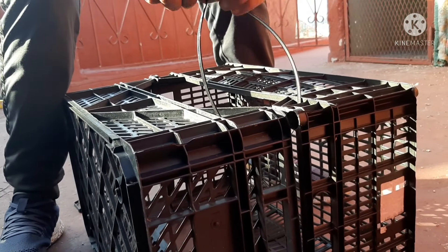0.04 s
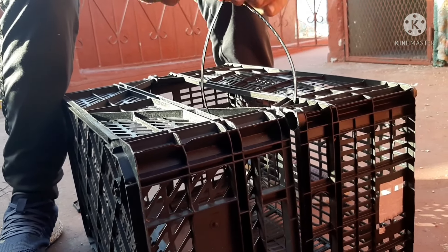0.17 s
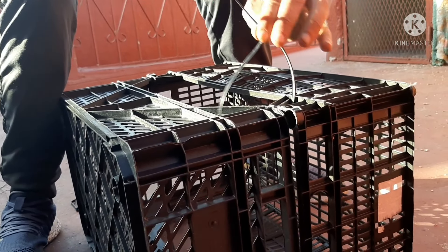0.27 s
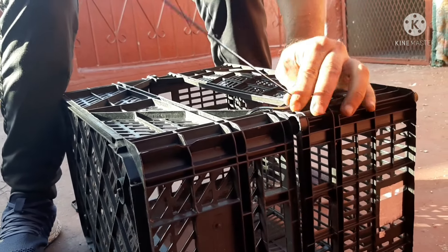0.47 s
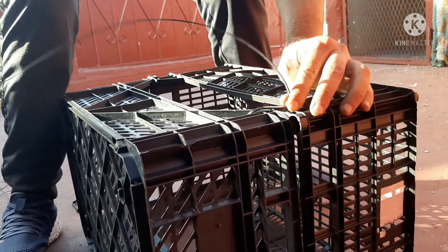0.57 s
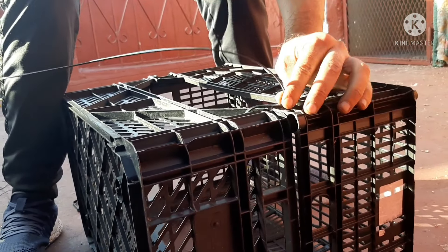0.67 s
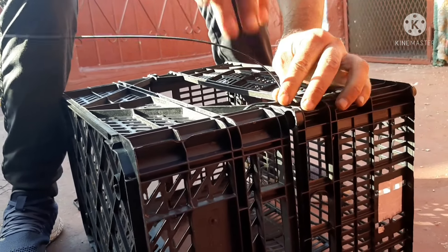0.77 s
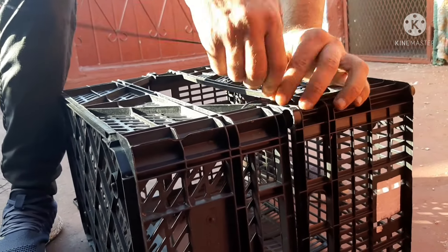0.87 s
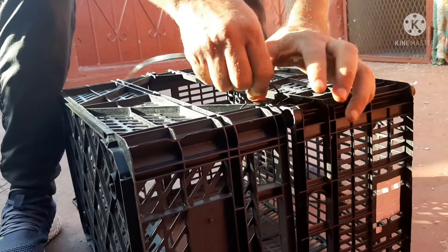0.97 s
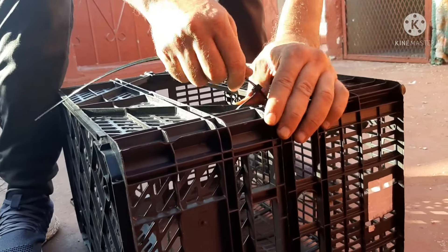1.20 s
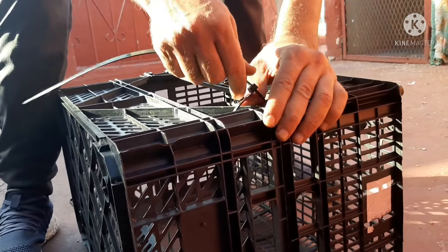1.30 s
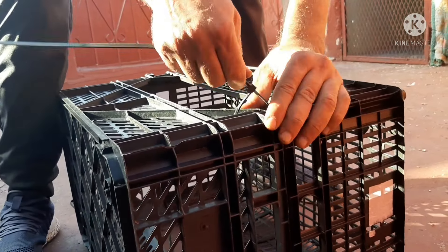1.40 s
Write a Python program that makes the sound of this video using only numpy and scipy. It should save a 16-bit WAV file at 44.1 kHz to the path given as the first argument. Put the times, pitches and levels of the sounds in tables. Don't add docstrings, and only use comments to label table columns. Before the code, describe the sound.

Close stereo sound of a plastic tie ratcheting on a plastic crate, one fast rising and falling zip, small rubs and taps of fingers, a short second tightening, and a faint bird over soft outdoor air.

```python
import sys
import numpy as np
from scipy import signal
from scipy.fft import rfft, irfft
from scipy.io import wavfile
from scipy.ndimage import uniform_filter1d

SR = 44100
rng = np.random.default_rng(int(sys.argv[2]) if len(sys.argv) > 2 else 0)


def persist_wave(psi):
    counts = np.round(np.clip(psi, -1, 1) * 32767).astype(np.int16)
    wavfile.write(sys.argv[1], SR, np.atleast_2d(counts).T)


def undo_db(level):
    steps = np.asarray(level, float) / 20
    return 10 ** steps


N = 63945

# pitch_hz, level_db_per_hz
AIR_SPECTRUM = [(59, -68), (100, 9.5), (2120, -12), (2630, -18), (4580, -20), (7480, -28), (8510, -42),
                (14800, -25.5), (16500, -62)]
# time_s, level_db
AIR_LEVEL = [(0, 6.5), (.24, 6), (.27, 1), (1.25, 1), (1.45, -3)]
# pitch_hz, likeness_0_to_1
AIR_LIKENESS = [(60, .72), (300, .8), (600, .5), (1500, .25), (15000, .2)]
# time_s, level_db
DRONE_LEVEL = [(0.0, -45), (0.036, -58.5), (0.088, -43.5), (0.116, -55.5), (0.234, -40), (0.286, -74),
               (0.37, -50), (0.634, -53), (0.654, -68), (0.69, -56), (1.356, -52), (1.45, -97.5)]
# pitch_hz, level_db_per_hz
DRONE_SPECTRUM = [(40, -9.5), (58, 4), (85, -4), (110, -29)]
# time_s, pitch_hz, level_db
BIRD = [
    (1.258, 3150, -80),
    (1.272, 3170, -62),
    (1.295, 2950, -63),
    (1.33, 2980, -63),
    (1.35, 2880, -67),
    (1.39, 2850, -80),
]
# start_s, length_s, level_db, centre_hz, width_octaves
SCUFFS = [(0.206, 0.11, -39, 2750, 4.1), (0.41, 0.24, -42, 3230, 2.84), (0.514, 0.042, -33.5, 3240, 5.6),
          (0.583, 0.0394, -45, 1200, 0.062), (0.547, 0.1, -46, 710, 3.7), (0.62, 0.08, -60, 12200, 5.1),
          (0.68, 0.13, -65, 2098, 0.044), (0.702, 0.18, -73.5, 13100, 0.46), (0.928, 0.091, -64, 6500, 2.1),
          (0.999, 0.066, -50, 4240, 1.1), (1.009, .03, -58, 13400, 0.45), (1.024, 0.1, -57, 4630, 1.7),
          (1.096, 0.1, -46, 850, 5.1)]
# time_s, peak_db, pitch_hz, brightness_db, knock_db
TAPS = [(0.0667, -47.5, 3860, -30, -12), (0.2184, -37, 5000, 2, -33), (0.2299, -23.5, 5600, -1, -30),
        (0.5291, -26, 5000, 4.5, -18), (0.5327, -30.5, 2300, 10.5, -13), (0.6616, -50, 5000, 8.5, -32),
        (0.7107, -39.5, 3692, -3.5, -34), (0.729, -52, 5000, -1, -27), (0.7319, -50, 5000, 5, -26),
        (0.773, -55, 5000, 0, -19), (0.8056, -49.5, 2045, 9, -4.5), (0.8419, -37, 5510, 4.5, -12.5),
        (.8465, -45, 5000, 5.5, -31), (.9711, -49, 5000, 3.5, -33), (1.006, -50, 5000, 2, -27),
        (1.025, -36, 5000, -0.5, -27), (1.0401, -27, 5330, 2, -28.5), (1.070, -36.5, 5000, -6, -19.5),
        (1.1064, -32, 5630, -4.5, -16.5), (1.1154, -40.5, 5000, -11, -31), (1.355, -47.5, 2696, -29, -34)]
# pitch_hz, level_db_per_hz
SKIN_SPECTRUM = [(290, -40), (500, -12), (1240, -3), (2300, -7), (4110, -2), (8420, -4), (15500, -4),
                 (17000, -20)]
# pitch_hz, level_db, t60_s
WALL_MODES = [(629, -1, 0.09), (1200, -2, 0.091), (2200, -7.5, 0.077)]
TOOTH_TIMES = [.2372, .2451, .2565, .2615, .2674, .273, .2771, .2811, .2851, 1.1182, 1.1312, 1.139, 1.1464,
               1.154, 1.166, 1.1875]
# peak_db, crate_relative_db, ring_t60_s
TOOTH_SOUNDS = [(-14, -19, 0.032), (-9.5, -21.5, .024), (-21.5, -19, .01), (-13, -26.5, .01),
                (-19, -26, .012), (-15.5, -26.5, .011), (-16.5, -19.5, .011), (-16, -15.5, .011),
                (-16.5, -23.5, .012), (-23, -9.5, 0.023), (-21, -6.5, 0.014), (-19, -6, 0.018),
                (-19, -8, 0.014), (-23.5, -6, 0.016), (-23.5, -7, 0.028), (-23, -7.5, 0.034)]
# time_s, teeth_per_second_hz
PULL_SPEED = [(.287, 330), (.3, 520), (.315, 750), (.33, 855), (.36, 995), (.39, 1050), (.418, 1085),
              (.432, 1025), (.46, 1005), (.498, 885), (.504, 720), (.522, 590), (.545, 450), (.565, 330),
              (.612, 275)]
# time_s, pawl_snap_db, crate_scrape_relative_db
PULL_FORCE = [
    (0.287, -29, -5.5),
    (0.317, -19.5, -15.5),
    (0.329, -24.5, -8.5),
    (0.353, -21.5, -11.5),
    (0.431, -32.5, -3.5),
    (0.455, -25.5, -22),
    (0.485, -38, -4.5),
    (0.603, -36.5, -15),
    (0.615, -51.5, -3),
]
# pitch_hz, level_db_per_hz
PAWL_SPECTRUM = [(3530, -31.5), (6000, -20.5), (8890, -3), (10500, 1), (15000, 7), (16000, -19.5),
                 (16500, -78.5)]
# pitch_hz, level_db_per_hz
CRATE_SPECTRUM = [(500, -22), (1500, -13), (3000, -12), (4200, -1), (6000, -2), (7800, -0.5), (9200, -12.5),
                  (12500, -11)]
# time_s, whine_db
SINGING = [(.29, -64), (.31, -56), (.36, -52), (.42, -45), (.46, -47), (.495, -50), (.503, -60),
           (.512, -56), (.53, -63), (.56, -65)]
# pitch_hz, level_db
WHINE_SPECTRUM = [(400, 7), (1000, 0), (1350, 5), (1600, -1), (2150, 11), (2700, -11), (3800, -10),
                  (4300, 2)]
# start_s, end_s, centre_hz, width_hz
HOLLOWS = [(.25, .315, 3750, 170), (.3, .36, 3500, 240), (.28, .335, 8050, 420), (.28, .345, 9300, 260),
           (.34, .475, 8800, 200), (.37, .41, 730, 70), (.40, .44, 2450, 90), (.435, .465, 5300, 220),
           (.295, .33, 5300, 130), (.52, .57, 8000, 200), (.52, .57, 9000, 180), (.565, .595, 3600, 130),
           (.585, .62, 4300, 130), (.595, .62, 2400, 130), (1.19, 1.3, 8800, 350), (.1, .225, 9000, 800),
           (1.15, 1.2, 2900, 110), (1.165, 1.2, 1800, 80)]

LEAD = 128
RING_SIZE = 4096
SIDES = np.array([[1], [-1]])
SECONDS = np.arange(N) / SR


def read(points, hz):
    f, value = np.transpose(points)
    return np.interp(np.log(hz + 1), np.log(f + 1), value)


def curve(table, off=-120):
    table = np.array(table, float)
    return [np.interp(SECONDS, table[:, 0], column, off, off) for column in table.T[1:]]


def evened(x):
    return x / np.sqrt(np.mean(x ** 2) + 1e-20)


def drift(width):
    return evened(uniform_filter1d(rng.standard_normal(N), width))


def colour(x, points):
    hz = np.fft.rfftfreq(x.shape[-1], 1 / SR)
    below = (points[0][0] * .5, points[0][1] - 25)
    above = (points[-1][0] * 1.3, points[-1][1] - 25)
    return irfft(rfft(x) * undo_db(read([below] + list(points) + [above], hz)), x.shape[-1])


def ring(points, t60, spike):
    t = np.arange(RING_SIZE) / SR
    x = rng.standard_normal((2, RING_SIZE)) * undo_db(-60 * t / t60)
    left_lag = rng.integers(7)
    x[[0, 1], [left_lag, 0]] += spike
    run_in = np.sin(np.pi / 2 * np.minimum(t * SR / LEAD, 1)) ** 2
    x = colour(np.roll(x, LEAD, 1), points) * run_in
    return x / np.linalg.norm(x, axis=1, keepdims=True)


def strike(train, points, t60, spike, count=12):
    pick = rng.integers(0, count, N)
    out = np.zeros((2, N))
    for k in range(count):
        kicks = (train * (pick == k))[None]
        out += signal.oaconvolve(kicks, ring(points, t60, spike))[:, LEAD:N + LEAD]
    return out


def place(out, s, sound):
    out[:, round(s * SR) - LEAD:][:, :RING_SIZE] += sound


def air():
    frames, hz = N // 512 + 5, np.fft.rfftfreq(2048, 1 / SR)
    a, b, c, d, patches = rng.standard_normal((frames, 1025, 5)).T
    patches = evened(uniform_filter1d(uniform_filter1d(patches, 20, 0), 6, 1))
    same = np.clip(read(AIR_LIKENESS, hz), -1, 1)[:, None]
    left = a + 1j * b
    right = same * left + np.sqrt(1 - same ** 2) * (c + 1j * d)
    z = np.array([left, right]) * undo_db(read(AIR_SPECTRUM, hz)[:, None] + 1.5 * patches)
    wash = evened(signal.istft(z, nperseg=2048, noverlap=1536)[1][:, :N])
    return undo_db(-57 + curve(AIR_LEVEL, off=0)[0]) * wash


def drone():
    a, b = rng.standard_normal((2, N))
    rumble = colour(np.array([a + .4 * b, .9 * a - .4 * b]), DRONE_SPECTRUM)
    return undo_db(curve(DRONE_LEVEL, off=-60)[0]) * evened(rumble)


def bird():
    hz, db = curve(BIRD)
    burr = np.clip((SECONDS - 1.28) / .015, 0, .85)
    throb = 1 - burr + 1.04 * burr * np.sin(2 * np.pi * 130 * SECONDS + drift(400))
    return undo_db(db + 2.0) * throb * np.sin(2 * np.pi * np.cumsum(hz) / SR)


def rub():
    out = np.zeros((2, N))
    for s, length, db, hz, octaves in SCUFFS:
        edge = 2 ** octaves
        grains = rng.standard_normal((2, N)) * undo_db(1.8 * drift(100))
        progress = np.clip((SECONDS - s) / length, 0, 1)
        swell = np.sin(np.pi * progress ** .8) ** 1.5
        band = [(hz / edge, -14), (hz, 0), (hz * edge, -14)]
        out += undo_db(db) * swell * evened(colour(grains, band))
    return out


def taps():
    out = np.zeros((2, N + RING_SIZE))
    t = np.maximum(np.arange(RING_SIZE) - LEAD, 0) / SR
    for s, db, hz, bright_db, knock_db in TAPS:
        tap = undo_db(bright_db + 10.0) * ring(SKIN_SPECTRUM, .018, 1.5)
        if hz < 4500:
            tap += undo_db(-3.5 - 60 * t / .011) * np.sin(2 * np.pi * hz * t)
        for f, mode_db, t60 in WALL_MODES:
            tap += undo_db(mode_db + knock_db - 60 * t / t60) * np.sin(2 * np.pi * f * t)
        place(out, s, undo_db(db) * tap)
    return out[:, :N]


def teeth():
    out = np.zeros((2, N + RING_SIZE))
    for s, (db, crate_db, t60) in zip(TOOTH_TIMES, TOOTH_SOUNDS):
        pawl = ring(PAWL_SPECTRUM, t60, 3)
        crate = ring(CRATE_SPECTRUM, t60, 2.6)
        place(out, s, undo_db(db) * (undo_db(10.5) * pawl + undo_db(crate_db + 22.0) * crate))
    return out[:, :N]


def patchy(x):
    z = signal.stft(x, nperseg=1024, noverlap=896)[2]
    patches = rng.standard_normal(z.shape[1:])
    patches = evened(uniform_filter1d(uniform_filter1d(patches, 3, 0), 14, 1))
    return signal.istft(z * undo_db(4 * patches - 0.5), nperseg=1024, noverlap=896)[1][:, :N]


def whine(rate, turns):
    whine_db = curve(SINGING)[0]
    wobble = .3 * evened(uniform_filter1d(drift(200), 120))
    out = np.zeros((2, N))
    for k in range(1, 5):
        waver_db = (2.6 + .6 * k) * drift(220)
        right_lead = np.array([[0], [0.54 * k]])
        level_db = whine_db + read(WHINE_SPECTRUM, k * rate) + waver_db + SIDES / k
        out += undo_db(level_db) * np.sin(k * (2 * np.pi * turns + wobble) + right_lead)
    return out


def zip_pull():
    rate = curve(PULL_SPEED, off=0)[0]
    snap_db, crate_db = curve(PULL_FORCE)
    turns = np.cumsum(rate) / SR
    shaky = turns + .05 * drift(60)
    passed = np.floor(np.maximum.accumulate(shaky))
    train = (np.diff(passed, prepend=0) > 0) * np.sqrt(SR / (rate + 50))
    train = train * undo_db(2 * rng.standard_normal(N))
    loose = np.clip((SECONDS - .31) / .05, .2, 1)
    hiss = .55 * loose * rng.standard_normal(N) * undo_db(0.83 * drift(90))
    pawl = strike((train + hiss) * undo_db(snap_db), PAWL_SPECTRUM, .011, 5.)
    crate = strike((train + 1.43 * hiss) * undo_db(snap_db + crate_db), CRATE_SPECTRUM, 0.052, 1.9)
    return pawl + patchy(crate) + whine(rate, turns)


def yard(x):
    t = np.arange(SR // 2) / SR
    near_decay, far_decay = undo_db(-60 * t / .1), undo_db(-16 - 60 * t / 0.33)
    build_up = np.minimum(t / 0.004, 1)
    tail = rng.standard_normal((2, len(t))) * np.hypot(near_decay, far_decay) * build_up
    return signal.fftconvolve(x, tail / np.linalg.norm(tail[0]), axes=1)[:, :N]


def hollowed(x):
    hz, t, z = signal.stft(x, SR, nperseg=1024, noverlap=896)
    depth = np.zeros((len(hz), len(t)))
    for start, end, centre, width in HOLLOWS:
        across = ((hz[:, None] - centre) / width) ** 4
        along = ((2 * t - start - end) / (end - start)) ** 6
        depth += np.exp(-across - along)
    z = z * undo_db(-40 * np.minimum(depth, 1))
    return signal.istft(z, SR, nperseg=1024, noverlap=896)[1][:, :N]


def scene():
    near = undo_db(1) * zip_pull() + teeth() + taps() + rub()
    mix = near + undo_db(-11.5) * yard(near) + bird() + air() + drone()
    return hollowed(mix) * undo_db(-1.1 * SIDES)


def low_pass(x):
    return signal.sosfilt(signal.butter(12, 16820, fs=SR, output="sos"), x)


def record(dry):
    hz = np.fft.rfftfreq(N, 1 / SR)
    notch_db = -10 * np.exp(-((hz - 8650) / 600) ** 4)
    edge_db = -26 * np.clip((hz - 15550) / 300, 0, 1)
    return low_pass(irfft(rfft(dry) * undo_db(notch_db + edge_db), N))


dry = scene()
out = record(dry)
persist_wave(out)
```